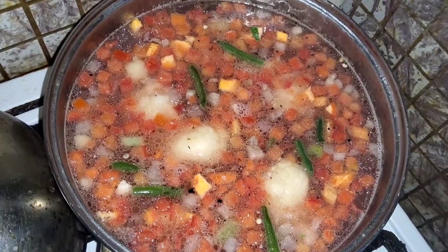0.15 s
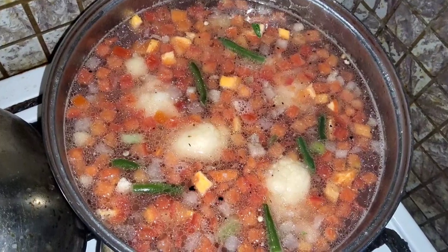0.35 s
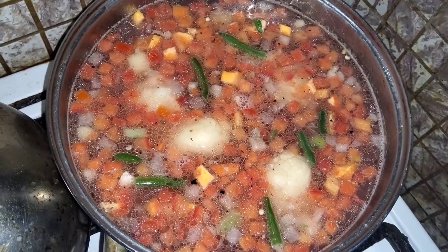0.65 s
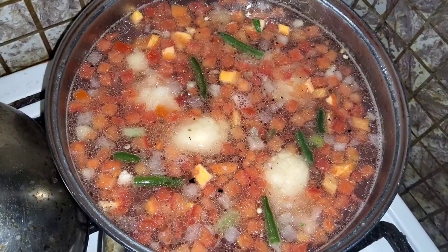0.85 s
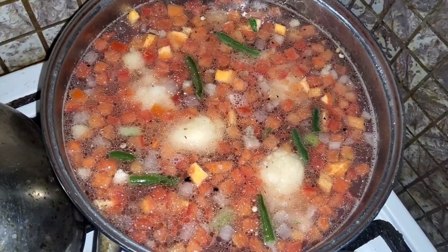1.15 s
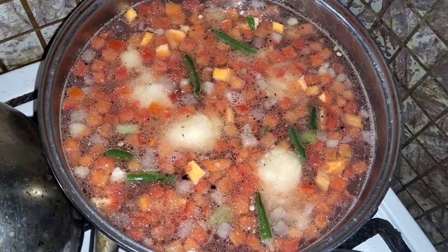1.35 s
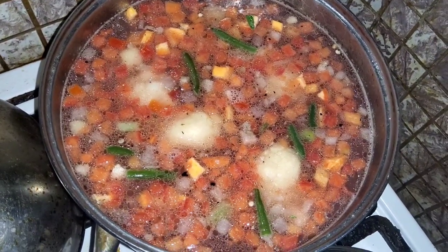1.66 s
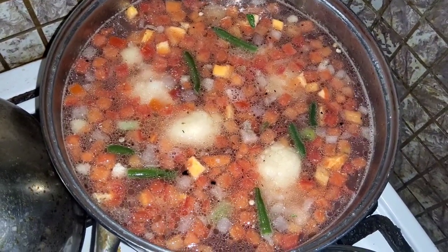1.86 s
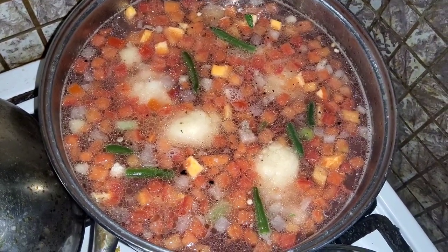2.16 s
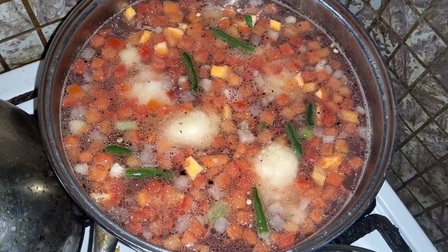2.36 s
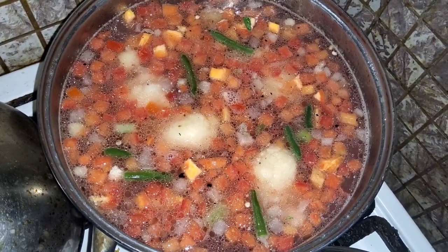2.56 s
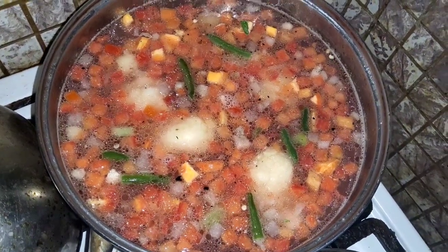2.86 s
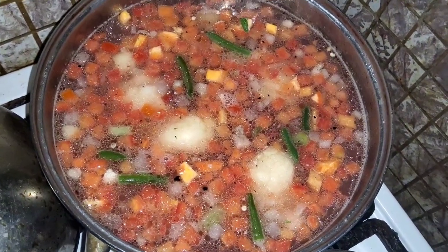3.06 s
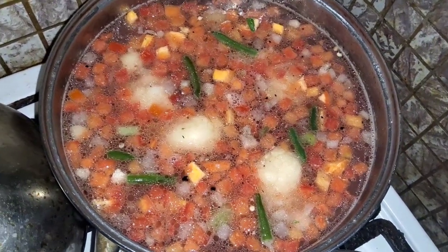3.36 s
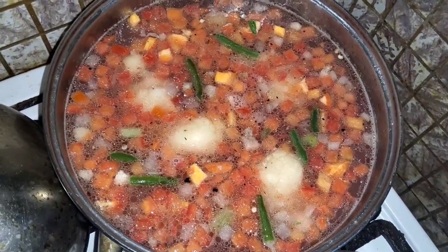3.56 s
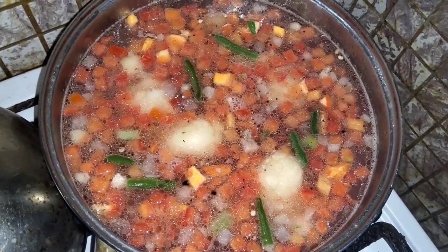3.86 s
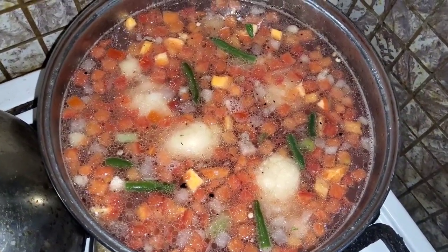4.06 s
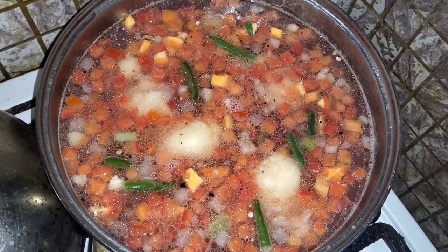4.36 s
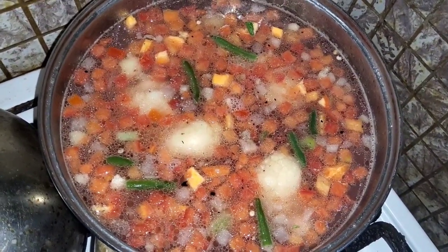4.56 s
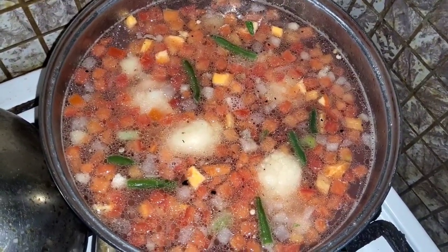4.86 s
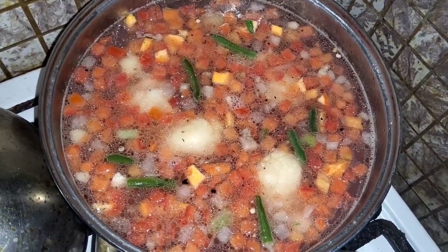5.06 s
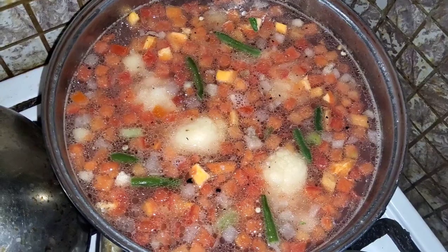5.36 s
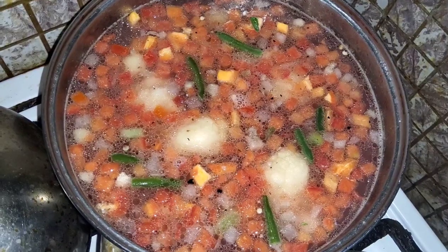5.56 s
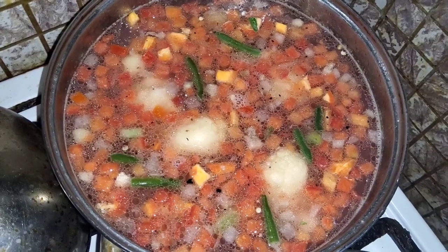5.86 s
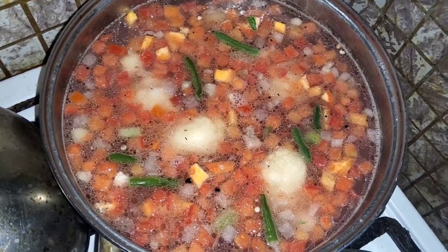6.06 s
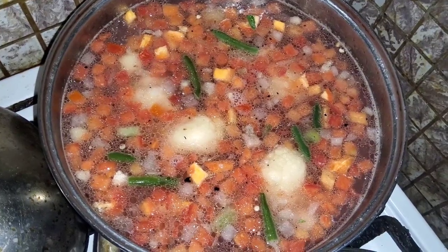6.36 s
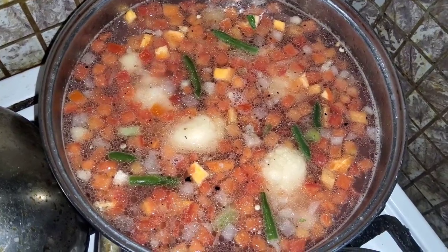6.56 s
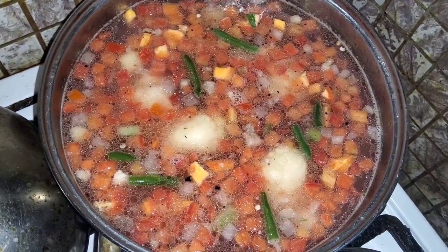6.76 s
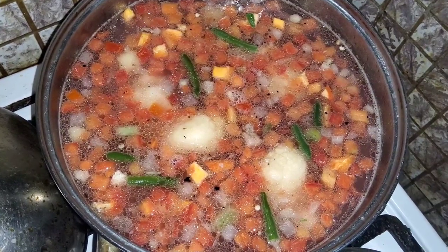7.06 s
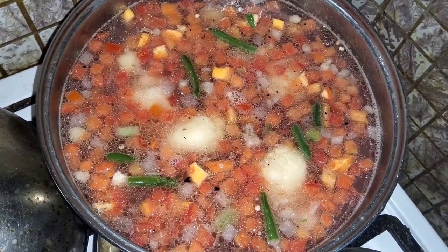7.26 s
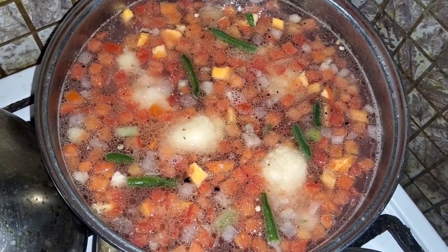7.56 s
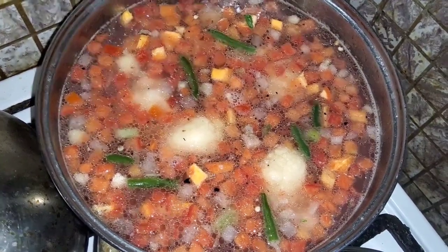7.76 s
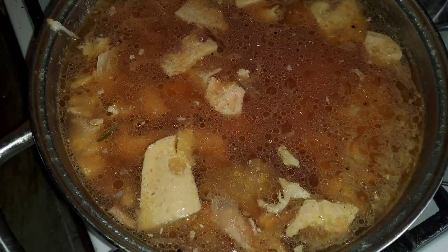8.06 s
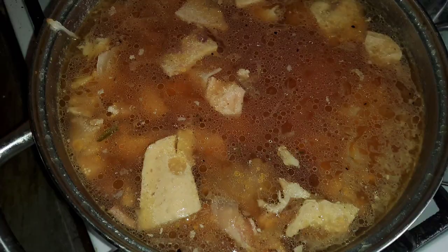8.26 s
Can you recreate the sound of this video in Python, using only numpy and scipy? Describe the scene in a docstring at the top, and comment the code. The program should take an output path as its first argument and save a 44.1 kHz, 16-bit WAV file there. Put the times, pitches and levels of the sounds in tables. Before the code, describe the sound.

Steady, slightly fluttering gas flame noise in a small kitchen, a soft wavering motor drone beneath, a single metallic click near the end, abrupt cutoff.

```python
"""A gas burner hisses under a soup pot, heard by two microphone ports just above it in a small tiled kitchen.
The jet is shaped noise plus noise rung through the air modes of burner tube, pot gap and worktop corner.
The flame adds low rumbling noise; one sharp metal tick, noise bursts and short rings, comes near the end.
A motor somewhere near drones as sines locked to its turns, beside a faint drifting whine.
The sound then stops abruptly and silence follows."""
import sys
import numpy as np
from scipy import signal
from scipy.fft import rfft, irfft, next_fast_len
from scipy.io import wavfile
from scipy.ndimage import uniform_filter1d

SR = 44100
rng = np.random.default_rng(int(sys.argv[2]) if len(sys.argv) > 2 else 0)


def put_to_file(sound):
    """Save the sound as 16-bit audio at rate SR, in the file named by the first command-line argument."""
    columns = np.atleast_2d(sound).T  # one column per channel
    safe = np.clip(columns, -1, 1)
    whole_steps = np.round(safe * 32767)
    wavfile.write(sys.argv[1], SR, whole_steps.astype(np.int16))


N = 370861

# Broad gas hiss before flow and flicker. Each row: frequency in Hz, left and right level in dB per Hz,
# likeness of the ports 0-1.
HISS_SPECTRUM = [(205, -84.5, -81, 0.85), (353, -90.5, -94, 0.8), (705, -90.5, -91.5, 0.71),
                 (1400.0, -99, -106, 0.2), (2130, -97.5, -106, 0.2), (2790, -104, -101, 0.3),
                 (3560, -118, -95.5, 0.1), (5140, -107, -101.5, 0.25), (6160, -99, -101, 0.2),
                 (8800.0, -103, -106, 0.1), (11300, -107, -112, 0.25), (12000, -112, -99, 0.25),
                 (14600.0, -101, -101, 0.2), (15700.0, -97, -98, 0.25)]
# Air modes of burner tube, pot gap and worktop corner. Each row: frequency in Hz, half-power width in Hz,
# left and right peak level in dB per Hz before flow and flicker, left lead in radians, likeness 0-1.
AIR_MODES = [(406, 27.0, -94, -85.5, -1.5, 0.83), (518, 27.0, -86, -87.5, -0.5, 1),
             (575, 33.0, -83, -88, -0.6, 0.95), (650, 50, -95, -95, 0, 0.9),
             (794, 54, -106, -93, 2.4, 0.45), (873, 43, -85.5, -114, 2.5, 0.5),
             (941, 43, -88.5, -82.5, -2.34, 0.85), (1019, 67, -91, -101, 2.05, 0.55),
             (1119, 83, -84.5, -87.5, 1.2, 0.95), (1236, 110.0, -84, -87, 1.47, 0.85),
             (1355, 45, -81, -113, 1.4, 0.85), (1444, 102, -106, -80.5, 4.5, 0.85),
             (1546.5, 60, -77.5, -80, 1.37, 0.96), (1613, 63, -81.5, -73.5, 0.92, 0.95),
             (1760, 35, -98.5, -94, 2.5, 0.5), (1913, 142, -90, -86.5, 3, 0.75),
             (2292, 100, -120, -92.5, 1.5, 0.7), (3280, 415, -93.5, -109, 1.5, 0.4),
             (3520, 44, -90, -103, 1.5, 0.3), (3833, 127, -87, -82, 2.5, 0.3),
             (4070, 290, -85, -92.5, 1.45, 0.4), (4520, 270, -88.5, -91, -2.05, 0.8),
             (4760, 236, -81.5, -90, -1.43, 0.9), (5210, 120, -93.5, -102, -1, 0.6),
             (5668, 220, -83.5, -85.5, 2, 0.35), (6097, 99, -88.5, -102, 1.1, 0.45),
             (7620, 440, -99.5, -93.5, 1, 0.65), (7564, 47, -86, -90.5, 0.8, 0.93),
             (8210, 280, -95.5, -99, 2, 0.35), (9580, 170, -110, -103, -7.5, 0.6),
             (9900, 1500, -99, -123, 3.5, 0.35), (12860, 1000, -93.5, -102, 2.5, 0.1),
             (15600, 150, -99.5, -110, -0.5, 0.4)]
# Flame rumble before flow. Each row: frequency in Hz, level in dB per Hz.
RUMBLE_SPECTRUM = [(20, -100), (34, -95.5), (44, -80), (52, -74.5), (65, -75), (105, -71), (120, -77.5),
                   (132, -72), (150, -77.5), (168, -78), (192, -91.5), (300, -100), (800, -140)]
# Flame size and gas flow. Each row: time in seconds, rumble gain in dB, hiss gain in dB.
FLOW_CURVE = [(0, 1, 1), (1, -1, 0), (2, 2, 0), (3, 2.5, 0.5), (4, 0.5, 0.5), (4.5, -1.5, 0), (5, 0, 0),
              (6, 1.5, 0.5), (6.7, 1, 0), (7.7, 0.5, 0.5)]
# Metal tick. Each row: start in seconds, level in dB, left minus right in dB.
TICKS = [(7.7647, -26, 3.5)]
# Rings of the tick. Each row: frequency in Hz, amplitude in dB re the tick level, T60 in seconds.
TICK_MODES = [(3280, -18, .04), (4270, -12, .04), (5416, -9, .05), (5900, -10.5, .04), (6300, -14, .08),
              (8820, -16.5, 0.048), (10800, -23, 0.033)]
# Third-order motor drone before flicker and pan. Each row: time in seconds, RMS level in dB.
DRONE_CURVE = [(0, -60), (1.1, -60), (1.6, -54.5), (1.8, -57.5), (1.97, -49), (2.12, -53), (2.3, -47.5),
               (2.65, -55.5), (2.79, -45), (2.9, -55), (3.18, -45), (3.4, -52.5), (3.7, -46.5), (3.92, -54),
               (4.28, -50.5), (4.45, -61.5), (5.15, -55.5), (5.5, -60), (5.86, -47), (5.98, -56),
               (6.1, -49), (6.9, -52.5), (7.3, -52.5), (7.85, -61.5)]
# Other motor tones before wander. Each row: multiple of the turn rate, RMS level in dB.
MOTOR_ORDERS = [(1, -69.5), (2, -63.5)]
# Steady-pitch tones near the motor's, before wander. Each row: frequency in Hz, RMS level in dB.
NEIGHBOUR_TONES = [(49.2, -63), (135.5, -63)]
# Thin wandering whine. Each row: time in seconds, frequency in Hz, RMS level in dB.
WHINE_CURVE = [(0, 644, -71), (.6, 647, -74), (1.5, 655, -73), (2.7, 657, -74), (3.1, 652, -73),
               (3.55, 655, -73), (3.95, 643, -70), (4.4, 646, -68), (4.9, 650, -71), (5.2, 655, -73),
               (6.6, 652, -73), (7.85, 652, -75)]

FLICKER_EDGES_HZ = [0, 700, 1400, 2800, 5200, 8500, SR]
ECHO_DB, ECHO_T60_S = -9, .1
RUMBLE_LIKENESS = 0.94
# tick parts: gains re the tick level, before band-pass
CRACK_DB, CRACK_T60_S = -1.5, 0.046
SNAP_DB, SNAP_T60_S, SNAP_PAN_DB = -4, 0.037, 5.5
KNOCK_DB, KNOCK_T60_S = -6.5, .14
TAIL_DB, TAIL_T60_S = -8, 0.31
TICK_RISE_S = 0.00092
MOTOR_HZ, MOTOR_WAVER_HZ = 46.8, .15
DRONE_PAN_DB, DRONE_FLICKER_DB, DRONE_FLICKER_PER_S = -2.2, 1.5, 12
STOP_S, STOP_FADE_S, STOP_TRAIL_DB, STOP_TRAIL_S = 7.852, .0015, -14.5, 0.027
TOP_HZ = 15750

TIME_S = np.arange(N) / SR
SIZE = next_fast_len(N)
HZ = np.maximum(np.arange(SIZE // 2 + 1) * SR / SIZE, 1)


def undb(db):
    """Amplitude gain of a level in dB."""
    return 10 ** (np.asarray(db) / 20)


def split_pan(pan_db):
    """Gains of left and right for a left-minus-right difference in dB."""
    return undb([[pan_db / 2], [-pan_db / 2]])


def on_hz(points_hz, values):
    """A spectrum joined by straight lines on a log-frequency axis."""
    return np.interp(np.log(HZ), np.log(points_hz), values)


def noise():
    """Spectrum of white noise at 0 dB per Hz."""
    parts = rng.standard_normal((len(HZ), 2))
    return parts @ np.array([1, 1j]) * np.sqrt(SIZE * SR) / 2


def pair(likeness):
    """Spectra of two noises with the given correlation, from a mid and a side noise."""
    like = np.clip(likeness, 0, 1)
    mid = noise() * np.sqrt((1 + like) / 2)
    side = noise() * np.sqrt((1 - like) / 2)
    return np.array([mid + side, mid - side])


def walk(rate_per_s):
    """Random levels, each held for 1 / rate, smoothed twice; standard deviation 1."""
    hold = int(SR / rate_per_s)
    steps = np.repeat(rng.standard_normal(N // hold + 1), hold)
    smooth = uniform_filter1d(uniform_filter1d(steps, hold), hold)[:N]
    return smooth / np.std(smooth)


def decay(t_s, t60_s):
    """Exponential decay: 60 dB down after t60_s."""
    return np.exp(-np.log(1000) * t_s / t60_s)


def hiss(flow_db):
    """Turbulent gas jet: broad noise and the air modes it rings; bands of the sum flicker independently."""
    hz, left_db, right_db, likeness = np.transpose(HISS_SPECTRUM)
    low_cut = np.clip(HZ / hz[0], 0, 1) ** 4
    levels_db = [on_hz(hz, left_db), on_hz(hz, right_db)]
    spectrum = pair(on_hz(hz, likeness)) * undb(levels_db) * low_cut
    for mode_hz, width_hz, mode_left_db, mode_right_db, lead_rad, alike in AIR_MODES:
        # two equal resonances in cascade: steep skirts
        resonance = 1 / (1 + .64j * (HZ ** 2 - mode_hz ** 2) / (HZ * width_hz)) ** 2
        port_gains = np.array([[undb(mode_left_db) * np.exp(1j * lead_rad)], [undb(mode_right_db)]])
        spectrum += pair(alike) * resonance * port_gains
    spectrum *= echoes()
    out = 0
    for low_hz, high_hz in zip(FLICKER_EDGES_HZ, FLICKER_EDGES_HZ[1:]):
        in_band = (HZ > low_hz) & (HZ <= high_hz)
        band = irfft(spectrum * in_band, SIZE)[:, :N]
        flicker_db = 0.69 * walk(4) + .5 * walk(25)
        out = out + band * undb(flicker_db)
    return out * undb(flow_db)


def echoes():
    """Response of pot, tiles and worktop at each port: direct sound and a dense decaying tail."""
    t = np.arange(SR // 5) / SR
    tail = rng.standard_normal((2, len(t))) * decay(t, ECHO_T60_S) * (t > .001)
    tail *= undb(ECHO_DB) / np.sqrt(np.sum(tail ** 2, axis=1, keepdims=True))
    # keep the expected power unchanged
    return (1 + rfft(tail, SIZE)) / np.sqrt(1 + undb(2 * ECHO_DB))


def flame(rumble_db):
    """Unsteady burning: low-frequency noise, nearly the same at both ports."""
    hz, db = np.transpose(RUMBLE_SPECTRUM)
    spectrum = pair(RUMBLE_LIKENESS) * undb(on_hz(hz, db))
    return irfft(spectrum, SIZE)[:, :N] * undb(rumble_db)


def burst(t_s, low_hz, high_hz, gain_db, t60_s):
    """Decaying band of noise, independent at each port."""
    bandpass = signal.butter(2, [low_hz, high_hz], "bandpass", fs=SR, output="sos")
    rough = signal.sosfilt(bandpass, rng.standard_normal((2, len(t_s))))
    return undb(gain_db) * decay(t_s, t60_s) * rough


def ticks():
    """Hard metal contact: crack, airy snap, dull knock, tile tail and rings with separate phases per port."""
    out = np.zeros((2, N))
    t = np.arange(SR // 4) / SR
    for start_s, level_db, pan_db in TICKS:
        sound = burst(t, 2300, 6800, CRACK_DB, CRACK_T60_S)
        sound += burst(t, 7700, 15000, SNAP_DB, SNAP_T60_S) * split_pan(SNAP_PAN_DB)
        sound += burst(t, 400, 2600, KNOCK_DB, KNOCK_T60_S)
        sound += burst(t, 3600, 6600, TAIL_DB, TAIL_T60_S)
        for hz, db, t60_s in TICK_MODES:
            phase_turns = rng.random((2, 1))
            sound += undb(db) * decay(t, t60_s) * np.sin(2 * np.pi * (hz * t + phase_turns))
        rise = 1 - np.exp(-t / TICK_RISE_S)
        sound *= rise * undb(level_db) * split_pan(pan_db)
        start = int(start_s * SR)
        out[:, start:start + len(t)] += sound
    return out


def motor():
    """Motor, likely a fridge: low orders hum, the third swells and flickers; two near tones beat with them."""
    turn_rad = 2 * np.pi * np.cumsum(MOTOR_HZ + MOTOR_WAVER_HZ * walk(14)) / SR
    s, level_db = np.transpose(DRONE_CURVE)
    flicker_db = DRONE_FLICKER_DB * walk(DRONE_FLICKER_PER_S)
    drone = np.sin(3 * turn_rad) * undb(np.interp(TIME_S, s, level_db) + flicker_db)
    hum = np.zeros(N)
    for order, db in MOTOR_ORDERS:
        hum += np.sin(order * turn_rad) * undb(db + 1.3 * walk(6))
    for hz, db in NEIGHBOUR_TONES:
        tone = np.sin(2 * np.pi * (hz * TIME_S + rng.random()))
        hum += tone * undb(db + 2.1 * walk(3))
    return np.sqrt(2) * (hum + drone * split_pan(DRONE_PAN_DB))


def whine():
    """A thin sine whose pitch and level drift, the same at both ports."""
    s, hz, db = np.transpose(WHINE_CURVE)
    phase_rad = 2 * np.pi * np.cumsum(np.interp(TIME_S, s, hz)) / SR
    return np.sqrt(2) * np.sin(phase_rad) * undb(np.interp(TIME_S, s, db))


def scene():
    """Sum of gas hiss, flame, tick, motor and whine."""
    s, rumble_points_db, hiss_points_db = np.transpose(FLOW_CURVE)
    rumble_db = np.interp(TIME_S, s, rumble_points_db)
    flow_db = np.interp(TIME_S, s, hiss_points_db)
    return hiss(flow_db) + flame(rumble_db) + ticks() + motor() + whine()


def record(dry):
    """The sound stops short, trails faintly for a moment, then silence; a steep low-pass cuts the top."""
    stop = np.clip((STOP_S - TIME_S) / STOP_FADE_S + 1, 0, 1) ** 2
    trail = undb(STOP_TRAIL_DB) * np.clip((STOP_S - TIME_S) / STOP_TRAIL_S + 1, 0, 1) ** 2
    lowpass = signal.ellip(14, .2, 80, TOP_HZ, fs=SR, output="sos")
    return signal.sosfilt(lowpass, dry * np.maximum(stop, trail))


dry = scene()
out = record(dry)
put_to_file(out)
```